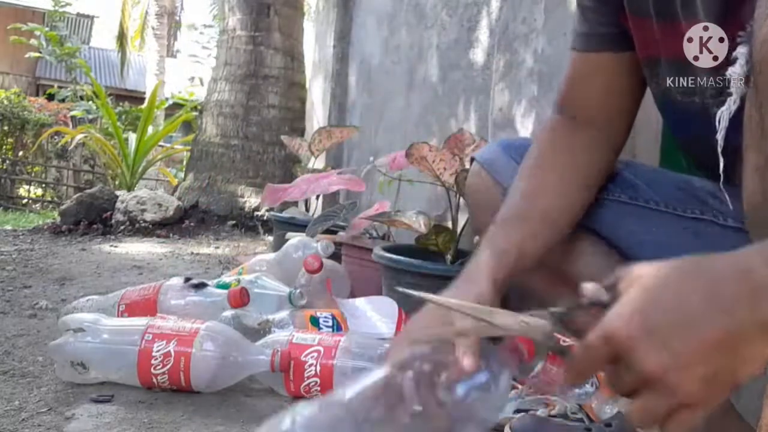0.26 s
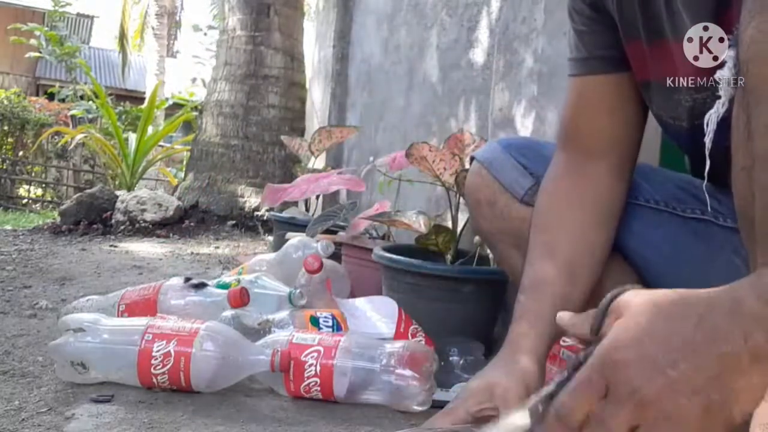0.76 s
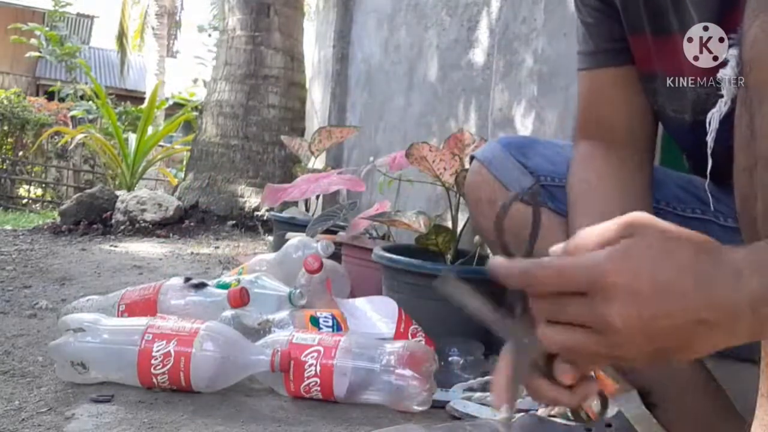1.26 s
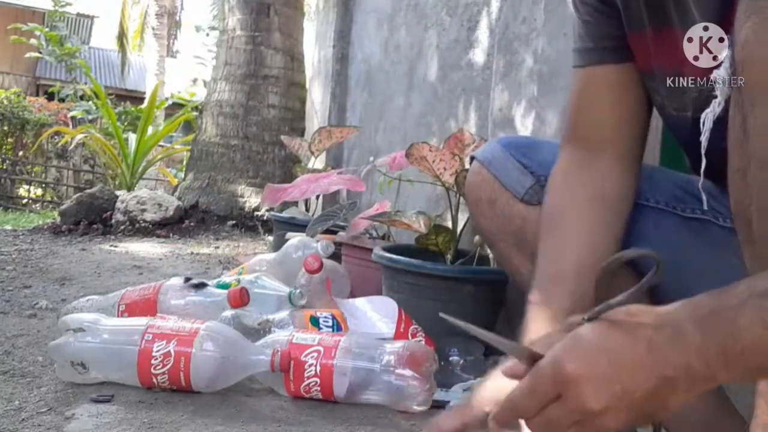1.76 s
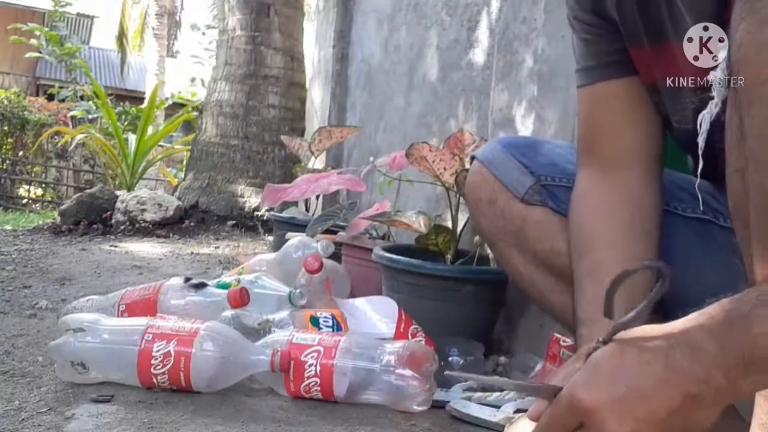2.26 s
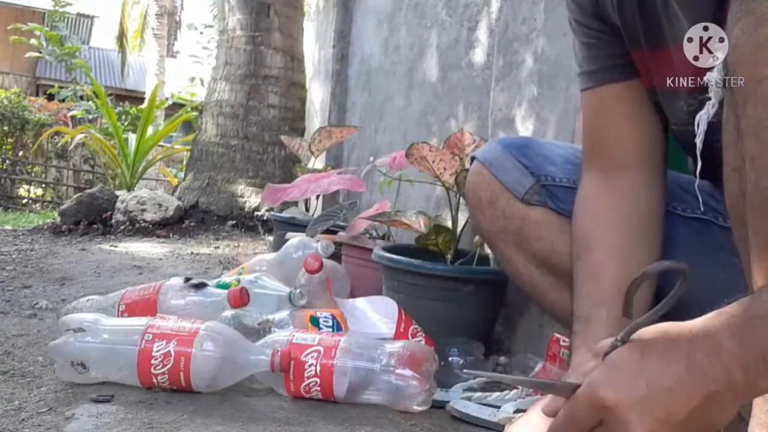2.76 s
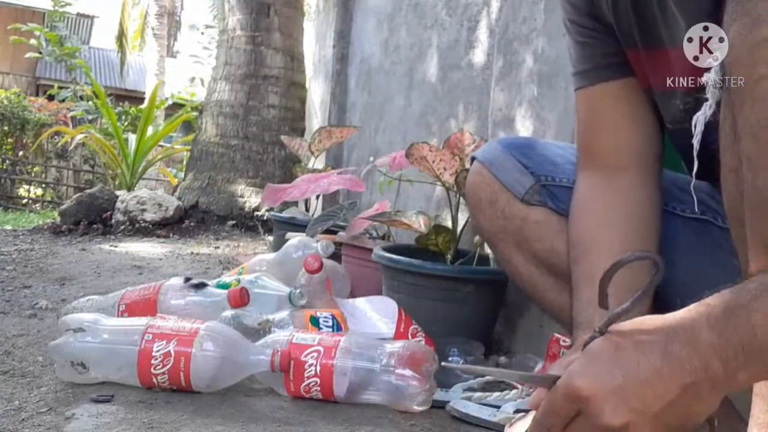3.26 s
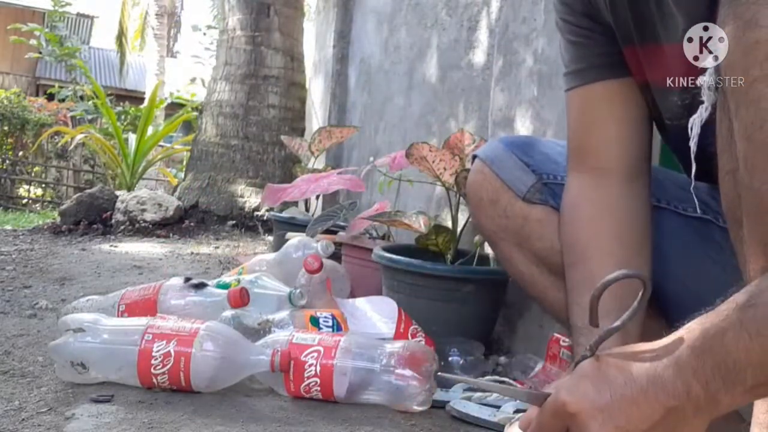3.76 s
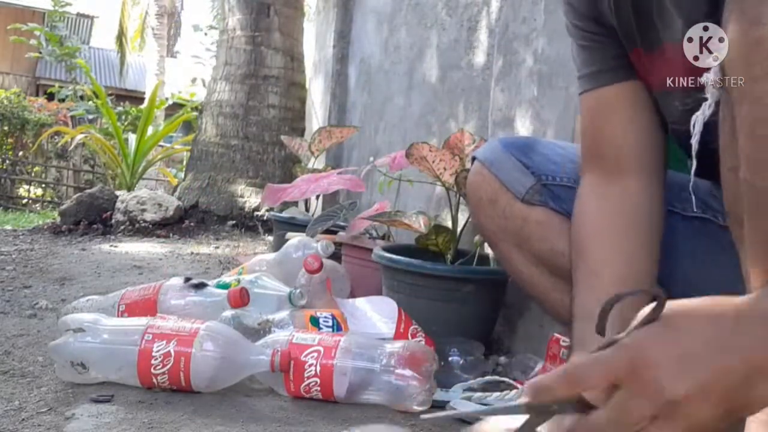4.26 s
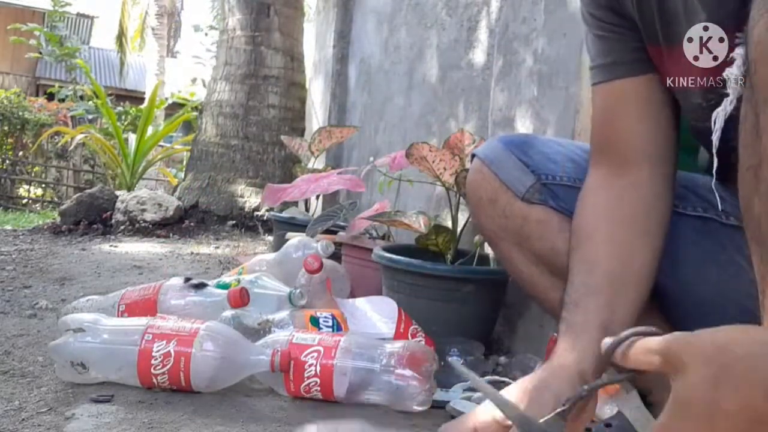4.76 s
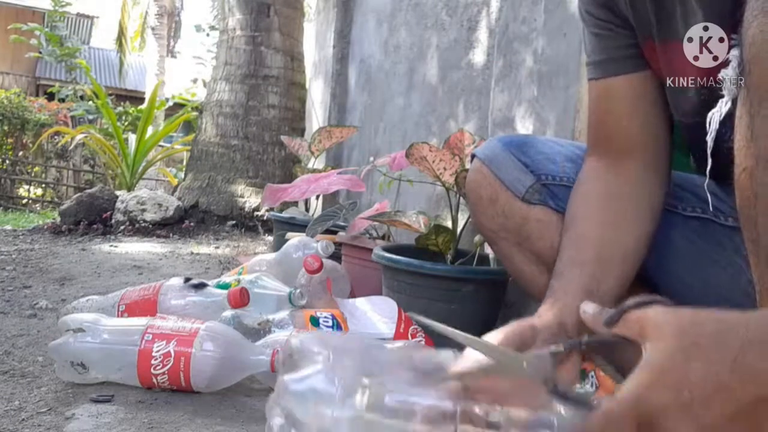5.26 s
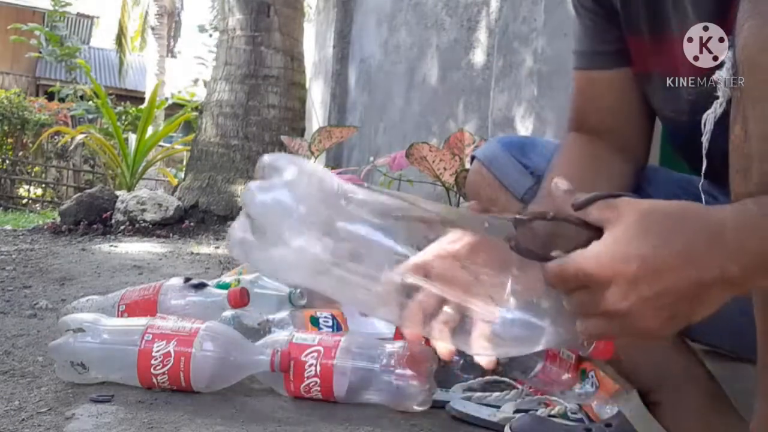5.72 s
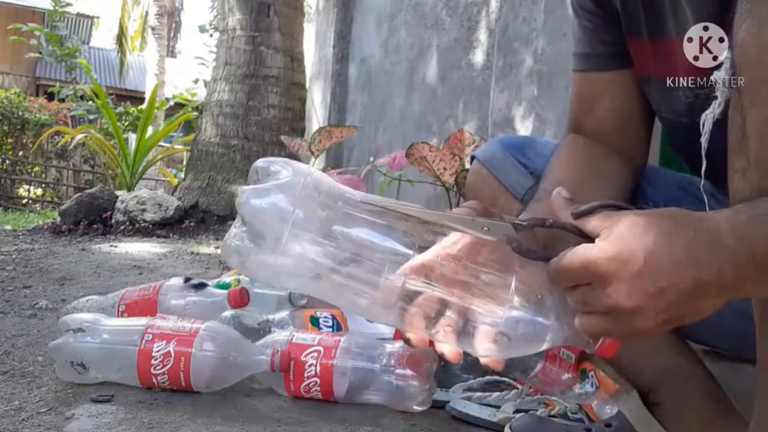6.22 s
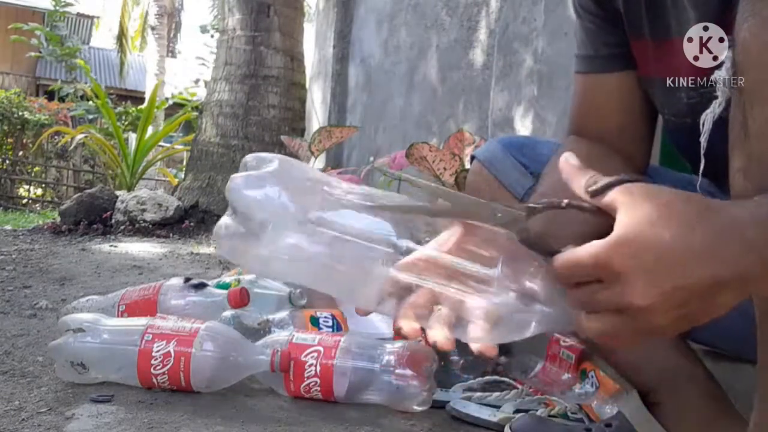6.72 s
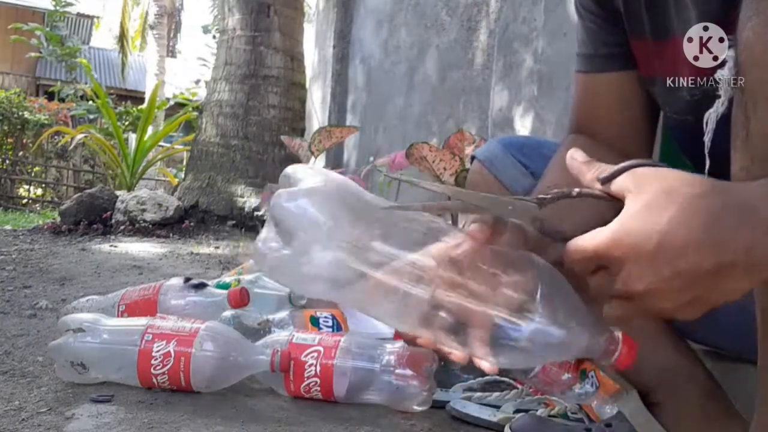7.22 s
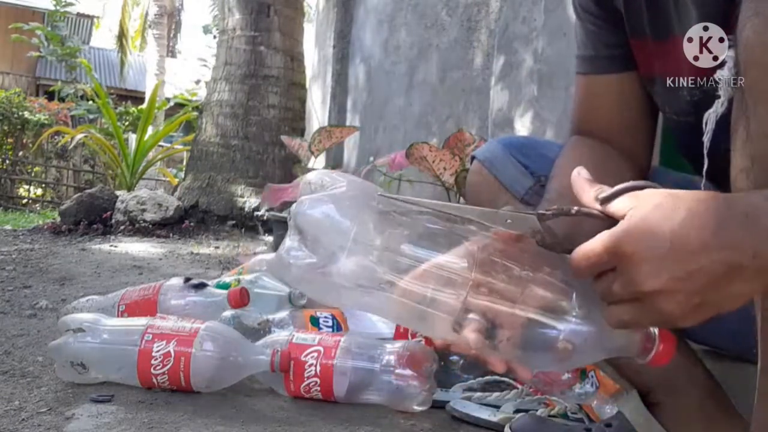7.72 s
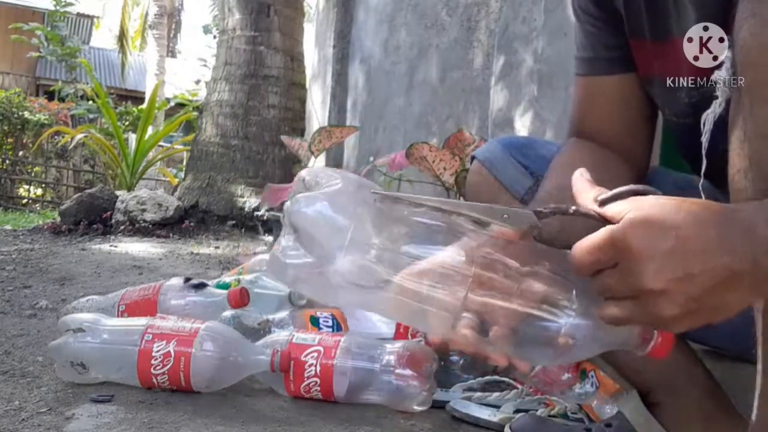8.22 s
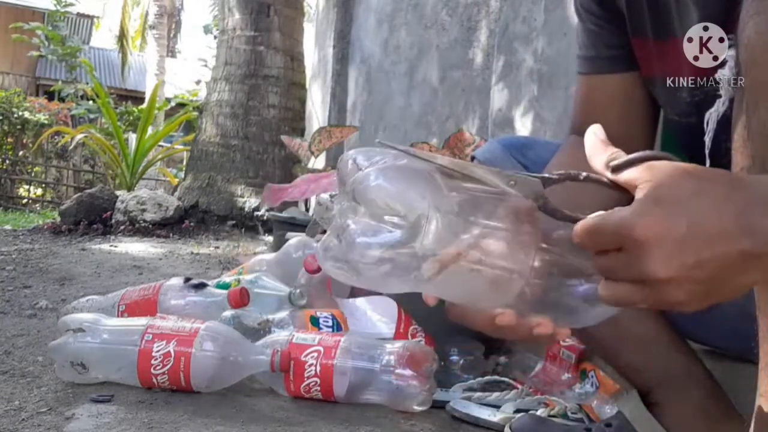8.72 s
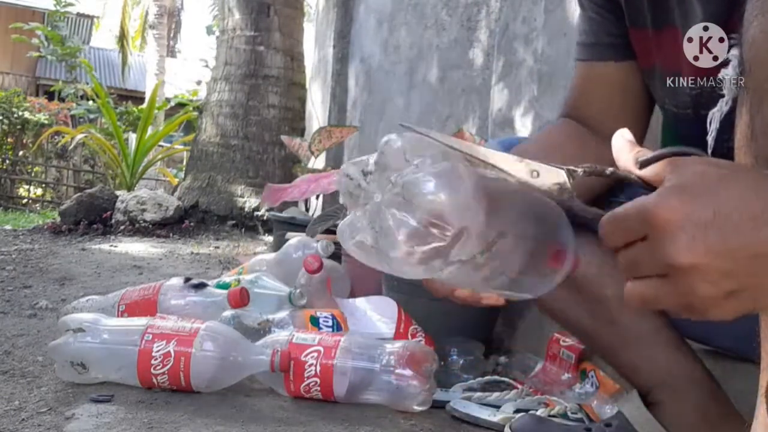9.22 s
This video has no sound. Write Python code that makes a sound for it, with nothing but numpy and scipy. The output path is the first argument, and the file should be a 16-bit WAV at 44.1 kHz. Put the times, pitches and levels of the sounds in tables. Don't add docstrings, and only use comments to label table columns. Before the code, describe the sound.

Hands and scissors work a thin plastic bottle in a yard: sharp hollow cracks, crinkling film, faint blade chatter, one hoarse cockerel crow midway.

```python
import sys
import numpy as np
from scipy import signal
from scipy.fft import rfft, irfft
from scipy.io import wavfile
from scipy.ndimage import uniform_filter1d

SR = 44100
rng = np.random.default_rng(int(sys.argv[2]) if len(sys.argv) > 2 else 0)


def makeup_ratio(level_db):
    decades = np.asarray(level_db, float) / 20
    return 10 ** decades


def pcm_store(signal):
    levels = np.round(np.clip(np.atleast_2d(signal), -1, 1) * 32767)
    wavfile.write(sys.argv[1], SR, levels.astype(np.int16).T)


N = 418068


def level(x, db):
    return x * makeup_ratio(db) / np.sqrt(np.mean(x ** 2))


def along(table, hz):
    table = np.array(table, float)
    return np.interp(np.log(np.maximum(hz, 1)), np.log(table[:, 0]), table[:, 1])


def curves(rows):
    s, *columns = np.transpose(rows)
    return [np.interp(np.arange(N) / SR, s, c) for c in columns]


def band(x, lo_hz, hi_hz):
    sos = signal.butter(2, [lo_hz, min(hi_hz, .45 * SR)], "band", fs=SR, output="sos")
    return signal.sosfilt(sos, x)


def walk(rate_hz):
    k = int(SR / rate_hz)
    steps = np.repeat(rng.standard_normal(N // k + 1), k)
    return 1.3 * uniform_filter1d(uniform_filter1d(steps, k), k)[:N]


# start_s, peak_db, panel_hz, edge_db (treble re peak)
TICKS = [(1.691, -30.5, 3120, 2.5), (1.712, -41, 1940, -2), (2.037, -47.5, 1880, 5), (2.2, -71, 2150, 7),
         (2.251, -57.5, 4730, 14), (2.317, -57.5, 2360, 6), (2.424, -39.5, 1690, -9), (2.547, -46, 2400, 0),
         (2.646, -52, 2440, 9), (2.875, -41.5, 4070, 2), (3.546, -47.5, 3190, 13.5),
         (3.929, -18.5, 1540, -4), (4.04, -4.5, 1170, -19), (4.095, -37.5, 1740, 2.5),
         (4.622, -16.5, 1320, -11), (6.48, -41, 900, -27), (7.67, -45, 1298, -25),
         (8.766, -30.5, 1240, -22), (8.864, -31, 1260, -15), (9.158, -25.5, 2240, -14.5),
         (9.176, -19.5, 1694, -15)]
# start_s, peak_db, panel_hz, edge_db
FOLDS = [(.321, -36.5, 1150, -6.5), (.478, -59, 910, 9), (.89, -54.5, 860, -11), (1.672, -32, 2300, -8.5),
         (1.764, -31, 3130, -10), (1.854, -31, 1810, -10.5), (3.361, -35.5, 2450, 1),
         (3.874, -31, 2330, -3.5), (3.947, -21, 1490, -15), (4.61, -21, 1670, -6), (5.467, -36, 1900, -9.5),
         (6.283, -42, 1710, -20.5), (6.447, -47, 890, -15), (6.503, -31.5, 1260, -17),
         (6.533, -18, 2280, -6), (7.843, -38, 2150, -5.5), (8.301, -30, 1060, -22),
         (8.442, -34.5, 1290, -5.5), (8.824, -29.5, 1420, -12), (8.974, -34.5, 1680, -15),
         (9.167, -34.5, 2360, -6), (9.426, -37, 1610, -14)]
# start_s, peak_db, panel_hz, edge_db
GRIP = [(.076, -54, 2640, 7), (.75, -43.5, 2430, -53), (1.426, -53, 2600, -1), (1.746, -35, 2870, -1),
        (1.785, -33.5, 2190, -7), (1.861, -34.5, 2260, 2.5), (2.004, -37, 2270, 3.5),
        (2.148, -47.5, 2820, 9.5), (2.228, -46.5, 720, -22), (2.399, -33.5, 1650, 4.5),
        (2.515, -27, 2380, -5), (2.588, -35.5, 1840, -4.5), (2.721, -50.5, 1330, 0.5),
        (2.892, -33, 2830, 7), (3.12, -35, 2220, 0), (3.727, -52, 1375, 1), (3.831, -55, 1382, 0)]
# start_s, peak_db, panel_hz, edge_db
PRESS = [(3.285, -14.5, 1510, -15.5), (3.302, -7, 1970, -10), (3.32, -10.5, 2920, -5.5),
         (3.47, -24, 960, -25.5), (3.478, -35, 1070, -31.5), (3.883, -25, 3305, 4),
         (3.935, -7, 1360, -10.5), (3.965, -7.5, 970, -24.5), (4.149, -16.5, 730, -31.5),
         (4.192, -5, 1341, -10.5), (4.218, -4, 2840, -15.5), (4.592, -30.5, 1560, -11),
         (4.737, -11, 2062, -2), (4.746, -11.5, 1622, -40), (4.852, -14, 2048, -17.5),
         (4.946, -20.5, 1830, -16.5), (4.993, -16, 1246, -26), (5.182, -25.5, 1720, -5),
         (5.248, -13.5, 1183, -34), (5.455, -41.5, 1880, -11), (5.488, -49.5, 1750, 4.5)]
# start_s, peak_db, panel_hz, edge_db
CUT = [(5.739, -54, 860, -31.5), (5.804, -50, 2260, -15), (5.782, -46, 2260, -25), (6.048, -44, 887, -10.5),
       (6.172, -54.5, 1286, 1.5), (6.315, -38, 803, -26), (6.373, -38.5, 1880, -19), (6.521, -8, 2630, -15),
       (6.75, -32.5, 2480, -6.5), (6.761, -35, 2320, -9), (6.923, -51.5, 2440, 2.5),
       (7.056, -41, 1920, -13), (7.169, -36, 1800, -6), (7.386, -22, 1907, -8), (7.479, -26.5, 2000, -21),
       (7.635, -33, 2240, -23), (7.76, -19, 2260, -25), (7.862, -18.5, 2480, -20.5),
       (7.87, -24.5, 2040, -2), (7.883, -23.5, 1790, -23), (7.964, -20, 2160, -40.5)]
# start_s, peak_db, panel_hz, edge_db
TURN = [(8.158, -35.5, 800, -20.5), (8.201, -19.5, 1450, -8.5), (8.216, -17.5, 1930, -17),
        (8.232, -20, 1910, -6), (8.257, -29, 2300, -6.5), (8.317, -9, 2530, -12.5), (8.323, -15.5, 2650, 0),
        (8.346, -3.5, 2180, -21.5), (8.735, -34.5, 2110, -4), (8.841, -25, 2300, -10),
        (8.903, -28, 1590, -26), (8.954, -47, 1870, -2), (9.038, -28.5, 1340, -24),
        (9.13, -18.5, 1850, -24), (9.327, -36.5, 1940, -34), (9.454, -23.5, 2620, -7.5)]
# table, crunch_db (re peak), thump_db (whole bottle)
KINDS = [(TICKS, -33.5, -0.37), (FOLDS, -2.5, 1.8), (GRIP, -21.5, -1.4), (PRESS, -23.5, -4.3),
         (CUT, -20, -5), (TURN, -22.5, 0.43)]


def cracks():
    out, t = np.zeros((2, N + 8192)), np.arange(4096) / SR
    events = [(*row, *db) for rows, *db in KINDS for row in rows]
    start_s, peak_db, panel_hz, edge_db, crunch_db, thump_db = np.transpose(events)
    count = len(start_s)
    noise = rng.standard_normal((count, 2, len(t)))
    grain = np.repeat(rng.exponential(size=(count, len(t) // 32)), 32, axis=1)

    second_slip = 0.13 * np.exp(-((t - .0025) / .0016) ** 2)
    slips = np.exp(-t / .0012) + second_slip * np.sqrt(grain)
    crunch_shape = np.exp(-t / 0.016) * np.clip(t / 0.0018, 0, 1)
    crunch = makeup_ratio(crunch_db + 6.5)[:, None] * crunch_shape * grain ** 0.78
    push = noise * (slips + crunch)[:, None]
    ringing = noise * (slips + .4 * crunch)[:, None]
    push[:, :, 3] += 1.2
    ringing[:, :, 3] += 1.2

    thump = makeup_ratio(thump_db)[:, None, None] * band(push, 135, 470)
    panel = body(push, ringing, panel_hz, ring_db=-6, scatter_db=5.5) + thump
    edge = band(push, 3600, 11300)

    def unit(x):
        return x / np.abs(x[:, :1]).max(axis=2, keepdims=True)

    snap = unit(panel) + makeup_ratio(edge_db + 4.5)[:, None, None] * unit(edge)
    snap = snap * makeup_ratio(peak_db - 4.0)[:, None, None]
    side = 0.4 * band(snap[:, 1], 1300, 21000)
    for i, mid, apart in zip((start_s * SR).astype(int) - 6, snap[:, 0], side):
        out[0, i:i + len(t)] += mid + apart
        out[1, i + 2:i + 2 + len(t)] += mid - apart
    return out[:, :N]


# centre_hz, width_hz, level_db
BOTTLE = [(140, 58, -9.5), (310, 160, 0.5), (720, 220, -1.5), (946, 420, -2.5), (1314, 400, -7),
          (2025, 350, -12), (3540, 510, -12.5)]


def body(push, ringing, panel_hz, ring_db, scatter_db):
    out = np.array([band(p, hz / 2.04, hz * 2.076) + makeup_ratio(ring_db) * band(r, hz / 1.12, hz * 1.079)
                    for p, r, hz in zip(push, ringing, panel_hz)])
    scatter = rng.standard_normal((len(BOTTLE), len(push)))
    for (hz, width_hz, db), chance in zip(BOTTLE, scatter):
        near_db = db + 6.5 - 14.55 * abs(np.log2(hz / panel_hz)) + scatter_db * chance
        gain = makeup_ratio(near_db) * np.sqrt(panel_hz / width_hz)
        out = out + gain[:, None, None] * band(ringing, hz - width_hz / 2, hz + width_hz / 2)
    return out


# start_s, end_s, body_db, treble_db
RUSTLE = [(8.553, 8.613, -73.5, -87), (0.837, 0.988, -73.5, -77), (1.665, 1.797, -68, -74),
          (1.826, 1.856, -70, -61.5), (1.931, 2.032, -75, -67.5), (2.095, 2.267, -90, -82),
          (2.394, 2.401, -53.5, -67), (2.488, 2.626, -62.5, -63.5), (2.499, 2.512, -54.5, -58),
          (7.158, 7.18, -66, -64.5), (6.87, 6.92, -79.5, -82), (4.733, 4.76, -42, -50),
          (2.815, 2.867, -74, -78), (3.889, 3.986, -49.5, -45), (4.133, 4.213, -50, -54),
          (4.195, 4.214, -45, -44), (5.418, 5.469, -57, -80), (5.731, 5.825, -71.5, -100),
          (6.277, 6.38, -60.5, -97), (6.44, 6.518, -75.5, -73.5), (7.245, 7.296, -80.5, -73),
          (7.462, 7.554, -53.5, -56), (7.814, 7.88, -75.5, -67.5), (8.139, 8.2, -67, -77.5),
          (8.298, 8.363, -36.5, -50), (6.64, 6.676, -90, -72.5), (8.757, 8.87, -63, -78),
          (8.947, 9.001, -71, -63.5), (9.118, 9.168, -53.5, -63), (9.269, 9.353, -66.5, -64.5),
          (9.42, 9.49, -57, -64)]


def rustle():
    out, t = 0, np.arange(N // 32 + 1) * 32 / SR
    for part, rate_hz in (("body", 210), ("treble", 550)):
        effort = 0
        for start_s, end_s, body_db, treble_db in RUSTLE:
            rise = np.clip((t - start_s) / 0.0054, 0, 1)
            fall = np.exp(-np.maximum(t - end_s, 0) / 0.02)
            effort = effort + makeup_ratio(body_db if part == "body" else treble_db) * rise * fall

        sizes = makeup_ratio(np.minimum(4.0 * rng.exponential(size=N), 11))
        clicks = (rng.random(N) < rate_hz / SR) * sizes
        smear = signal.lfilter([1], [1, -np.exp(-1 / (0.0017 * SR))], clicks ** 2) ** .5
        push = rng.standard_normal((2, N)) * (smear + 0.25)
        if part == "body":
            pair = np.broadcast_to(push, (2, 2, 2, N))
            panels = body(*pair, np.array([950, 2300]), ring_db=2, scatter_db=7)
            mid, side = band(panels.sum(0), 260, 3300)
        else:
            mid, side = band(push, 3600, 12000)
        side = 0.6 * band(side, 1500, 16000)
        stereo = level(np.array([mid + side, mid - side]), 1.2)
        out = out + stereo * np.repeat(effort, 32)[:N] * makeup_ratio(2.0 * walk(30))
    return out


# start_s, peak_db
CHATTER = [(0.705, -49.5), (0.74, -43.5), (0.795, -56), (0.891, -52.5), (0.974, -45.5), (1.066, -59.5),
           (1.118, -50.5), (1.225, -64), (1.292, -62.5), (1.468, -50.5)]
# pitch_hz, level_db, t60_s
BLADES = [(7470, -11, 0.03), (10700, -34, 0.039), (11370, 11, 0.046), (12430, 27, 0.018),
          (13500, -11, 0.023), (14500, -4, 0.037)]


def scissors():
    out, t = np.zeros((2, N)), np.arange(4096) / SR
    for start_s, peak_db in CHATTER:
        touch = rng.standard_normal((2, len(t))) * np.minimum(t / 0.0016, 1) * np.exp(-t / 0.013)
        ring = 0
        for hz, db, t60_s in BLADES:
            db_chance, hz_chance = rng.standard_normal(2)
            tone = np.sin(2 * np.pi * hz * (1 + 0.0011 * hz_chance) * t)
            ring = ring + makeup_ratio(db + 2.1 * db_chance) * tone * np.exp(-np.log(1000) * t / t60_s)
        rung = signal.fftconvolve(touch, ring[None], axes=1)[:, :len(t)]
        sound = level(rung, -9) + level(band(touch, 7000, 14500), 0)
        i = int(start_s * SR)
        out[:, i:i + len(t)] += makeup_ratio(peak_db + 5.5) * sound / np.abs(sound).max()
    return out


# start_s, peak_db, centre_hz
PRICKS = [(0.0314, -54, 10500), (0.2932, -59, 10000), (0.3885, -57, 11900), (0.5975, -58, 9360),
          (0.6374, -57, 9530), (0.6794, -58, 9550), (0.8545, -53, 11900), (1.335, -47.5, 8000),
          (1.6444, -66, 4500), (1.7754, -37, 11600), (1.8744, -43, 4790), (1.9314, -58, 8230),
          (1.94, -45, 10500), (2.0946, -64, 11500), (2.1064, -61, 4940), (2.1201, -54, 10500),
          (2.1654, -44, 10400), (2.1784, -50, 8980), (2.2164, -47, 9050), (2.2796, -49, 10200),
          (2.3038, -40.5, 11600), (3.41, -43, 12000), (4.195, -14.5, 4440), (5.1141, -49, 4754),
          (8.1269, -64, 8560), (8.1798, -44, 10200), (8.3126, -24, 5400), (8.4226, -39, 4660),
          (2.4728, -49, 10500), (2.4947, -34.5, 4570), (2.605, -43, 10700), (2.616, -41, 9930),
                (2.7691, -65, 9810), (2.7886, -61, 9580), (2.8374, -49.5, 10800), (2.9124, -44, 11200),
                (2.9432, -55, 7440), (2.9567, -51, 11200), (6.6518, -48.5, 10300), (6.7281, -38.5, 10400),
                (6.8867, -63, 7870), (7.2504, -58, 9860), (7.2629, -57, 5280),
          (2.1475, -31, 10200), (2.5466, -34, 11900), (2.5875, -37, 11700), (2.8744, -25, 11000),
         (3.2854, -15, 4510), (4.7396, -18, 5320), (8.8139, -47, 11000), (9.1124, -41, 5070)]
# start_s, peak_db,
# centre_hz
TAPS = [(0.335, -47, 751), (0.539, -61.5, 770), (0.971, -54.5, 899), (3.684, -64, 840), (4.601, -25, 1197),
        (5.826, -54, 2236), (5.946, -59.5, 773), (6.362, -38, 1828), (8.327, -15.5, 2050),
        (8.365, -26, 1380),
        (2.228, -49, 912), (5.805, -54, 1370), (6.295, -46, 824), (7.38, -29, 1150), (7.539, -39, 845),
             (7.889, -39, 1140), (8.295, -16, 713), (8.561, -59, 1470), (8.589, -64, 1470),
             (8.641, -64, 1070), (8.805, -37, 2060)]


def ticks_and_taps():
    out, t = np.zeros((2, N)), np.arange(1024) / SR
    bright, dull = PRICKS, TAPS
    for rows, decay_s, spread in ((bright, .0012, 1.7), (dull, .003, 1.35)):
        for start_s, peak_db, hz in rows:
            burst = rng.standard_normal((2, len(t))) * np.exp(-t / decay_s)
            mid, side = band(burst, hz / spread, hz * spread)
            side = side * min(hz / 5000, .6)
            stereo = np.array([mid + side, mid - side])
            i = int(start_s * SR)
            out[:, i:i + len(t)] += stereo * makeup_ratio(peak_db + 0.1) / np.abs(mid).max()
    return out


# start_s, end_s, pitch_hz, level_db
CREAKS = [(1.75, 1.85, 2100, -67), (1.75, 1.796, 1230, -64), (1.945, 2.045, 1310, -63.5),
          (4.151, 4.174, 1004, -37), (4.166, 4.193, 2420, -40.5), (4.264, 4.31, 2370, -57.5),
          (5.764, 5.785, 2290, -52), (5.798, 5.845, 2240, -69), (5.74, 5.77, 747, -66.5),
          (2.65, 2.687, 1390, -70), (2.719, 2.757, 1400, -68), (2.96, 3.007, 3900, -75),
          (3.231, 3.268, 3780, -74.5), (5.48, 5.57, 2270, -72), (8.56, 8.605, 1600, -68)]


def creaks():
    out, t = np.zeros((2, N)), np.arange(int(.2 * SR)) / SR
    for start_s, end_s, hz, db in CREAKS:
        slips = rng.standard_normal((2, len(t))) * np.repeat(rng.exponential(size=len(t) // 60), 60)
        fade = np.clip(t / .004, 0, 1) * np.exp(-np.maximum(t - end_s + start_s, 0) / 0.0065)
        mid, side = level(band(slips, hz / 1.085, hz * 1.085), db) * fade
        i = int(start_s * SR)
        out[:, i:i + len(t)] += [mid + .4 * side, mid - 0.44 * side]
    return out


# time_s, pitch_hz
CROW_PITCH = [(4.338, 1160), (4.38, 1300), (4.41, 1324), (4.45, 1257), (4.472, 1232), (4.478, 1088),
              (4.51, 1238), (4.7, 1244), (4.86, 1227)]
# time_s, pitch_hz
NOTE_PITCH = [(4.9, 1194), (5.15, 1178), (5.281, 1162), (5.37, 1139), (5.408, 1122), (5.42, 1083),
              (5.46, 1053)]
# time_s, effort_db, first_db (first partial re second, high with the beak nearly shut)
CROW_EFFORT = [(4.348, -53, 11), (4.38, -38.5, -9), (4.44, -41.5, -3.5), (4.475, -51, 1), (4.51, -44, -1),
               (4.88, -46.5, -4.5), (4.9, -47.5, -19.5), (5.17, -42, -8.5), (5.43, -45.5, -8)]
# multiple, level_db
CROW_UPPER = [(1, 0), (2, 0), (3, -13), (4, -17), (5, -23), (6, -35), (7, -41), (8, -35), (9, -25),
              (10, -28), (11, -24), (12, -25), (13, -40)]
# multiple, level_db (re second partial)
HALF_LINES = [(.84, -13), (1.5, -18), (2.45, -12.5), (3.75, -20)]


def cockerel():
    start_s, hoarse_from_s, hoarse_until_s, break_s = 4.34, 4.5, 4.89, 5.415
    attack_s, release_s = 0.0058, 0.018
    (hz,), (second_db, shut_db) = curves(CROW_PITCH + NOTE_PITCH), curves(CROW_EFFORT)
    first_db = second_db + shut_db
    t = np.arange(N) / SR
    hoarse = np.clip((hoarse_until_s - t) / 0.022, .05, 1) * np.clip((t - hoarse_from_s) / 0.067, .8, 1)
    hoarse = hoarse + np.clip((t - break_s) / 0.016, 0, 1)
    jitter = .021 * hoarse * walk(900) + .008 * hoarse * walk(60)
    phase = 2 * np.pi * np.cumsum(hz * (1 + jitter)) / SR
    flutter_db = .7 * walk(25) + hoarse * (4 * walk(200) + 2.2 * walk(70))

    upper_db = dict(CROW_UPPER)
    out = 0
    for k in upper_db:
        db = first_db if k == 1 else second_db + upper_db[k] - upper_db[2]
        shake_db = flutter_db
        if k > 2:
            hoarse_db = 4 * (k == 4) - 3 * (k > 6)
            shake_db = shake_db + 5 * walk(18) - 5.5 + hoarse * hoarse_db
            shake_db = shake_db - 20 * (t > break_s) * (4 < k < 8)
        lag = np.array([[0], [1.173 * min(k, 2) + rng.standard_normal() * (k > 2)]])
        partial = np.sin(k * phase + lag) * (k * hz < .36 * SR)
        out = out + np.sqrt(2) * makeup_ratio(db + 6.0) * makeup_ratio(shake_db) * partial

    for k, db in HALF_LINES:
        on = np.clip((t - hoarse_from_s) / 0.073, 0, 1) * np.clip((hoarse_until_s - t) / 0.013, 0, 1)
        out = out + makeup_ratio(second_db + db + 2.5 + 4.0 * walk(60)) * on * np.sin(k * phase)

    air = rng.standard_normal((2, N))
    rasp = level(band(air, 900, 3400), -12) * np.clip((t - hoarse_from_s) / .08, .4, 1)
    for lo_hz, hi_hz, db in ((4500, 5500, -16), (5600, 10000, -27), (10500, 15000, -19)):
        rasp = rasp + level(band(air, lo_hz, hi_hz), db)
    rasp = rasp * (1 + np.cos(phase)) * (hoarse + .1) * makeup_ratio(second_db)
    end_s = CROW_EFFORT[-1][0]
    gate = np.clip((t - start_s) / attack_s, 0, 1) * np.clip(1 - (t - end_s) / release_s, 0, 1) ** 2
    return (out + rasp) * gate * makeup_ratio([[-.8], [.8]])


def walls(x, t60_s, top_hz, gap_s, alike):
    t = np.arange(SR // 2) / SR
    decay = np.exp(-np.log(1000) * t / t60_s) * np.clip(t / gap_s, 0, 1)
    mid, side = rng.standard_normal((2, len(t))) * decay
    side = side - alike * band(side, 30, 1000)
    tails = band(np.array([mid + side, mid - side]), 55, top_hz)
    return signal.fftconvolve(x, tails / np.sqrt(np.sum(tails ** 2) / 2), axes=1)[:, :N]


# middle_s, half_length_s, level_db
LEAVES = [(.15, 0.22, -82), (0.666, .05, -74), (1.2, 0.36, -81.5), (2.2, .15, -79), (3.17, 0.075, -78),
          (3.8, 0.092, -80), (5.52, .04, -83), (5.901, .04, -78), (6.22, .04, -86.5), (6.655, 0.033, -71.5),
          (7.12, .06, -77), (7.74, .04, -77.5), (8.601, 0.081, -80), (9.302, .1, -78)]


def leaves():
    t = np.arange(N // 64 + 1) * 64 / SR
    hiss = level(band(rng.standard_normal((2, N)), 7500, 10300), 0)
    breeze = sum(makeup_ratio(db) * np.exp(-((t - middle_s) / half_s) ** 2) for middle_s, half_s, db in LEAVES)
    return hiss * np.repeat(breeze, 64)[:N] * makeup_ratio(1.9 * walk(25))


# freq_hz, density_db (per Hz)
YARD = [(15, -55), (25, -28), (108, -5), (175, 2.5), (249, -4), (373, -7.5), (840, -32.5), (1260, -27.5),
        (4870, -35.5), (9000, -38), (16000, -40)]
# freq_hz, left_right_correlation
YARD_LIKENESS = [(40, 0.53), (90, 0.96), (300, .92), (700, 0.8), (1500, 0.088), (15000, .02)]
# start_s, end_s, pitch_hz, level_db
FAR_NOTES = [(0.384, 1.54, 463, -74.5), (5.702, 6.362, 187.5, -72.5), (6.746, 7.142, 371, -75)]


def yard():
    out, swell, t = 0, walk(0.72), np.arange(N) / SR
    for hz in 35 * 2 ** np.arange(0, 9, .5):
        mid, side = band(rng.standard_normal((2, N)), hz / 1.19, hz * 1.107)
        alike = np.clip(along(YARD_LIKENESS, hz), 0, 1)
        pair = np.sqrt(1 + alike) * mid + np.sqrt(1 - alike) * side * np.array([[1], [-1]])
        out = out + makeup_ratio(along(YARD, hz) + 1.2 * swell + 2.2 * walk(6)) * pair
    out = level(out, -65.5)
    for start_s, end_s, hz, db in FAR_NOTES:
        fade = np.clip((t - start_s) / 0.055, 0, 1) * np.clip((end_s - t) / 0.041, 0, 1)
        gain = np.sqrt(2) * makeup_ratio(db + 3.0 * walk(12)) * fade
        out = out + gain * np.sin(2 * np.pi * np.cumsum(hz * (1 + .004 * walk(5))) / SR)
    return out


def scene():
    bottle, bird = cracks() + rustle() + scissors(), cockerel()
    near = makeup_ratio(-19.5) * walls(bottle.mean(0)[None], t60_s=0.17, top_hz=8800, gap_s=0.018, alike=0.5)
    far = makeup_ratio(-14) * walls(bird[:1], t60_s=0.3, top_hz=3200, gap_s=0.026, alike=0.56)
    hold = .25 * SR
    loudness = signal.lfilter([1 / hold], [1, -np.exp(-1 / hold)], bottle[0] ** 2)
    duck = (1 + loudness / makeup_ratio(-105)) ** -.12
    small = ticks_and_taps() + creaks() + leaves()
    return bottle + near + bird + far + duck * yard() + small


def top_cut(x):
    return signal.sosfilt(signal.butter(12, 16640, fs=SR, output="sos"), x)


# freq_hz, left_minus_right_db
PORTS = [(60, .4), (1000, .6), (3500, 1.5), (6000, 6), (9000, 14), (13000, 8), (16000, 8)]


def record(dry):
    hz = np.fft.rfftfreq(N, 1 / SR)
    ratio = makeup_ratio(along(PORTS, hz))
    ends = makeup_ratio(-np.clip(hz - 15300, 0, 3000) * .02) * np.clip(hz / 70, 0, 1) ** 2.2
    balance = np.array([2 * ratio / (1 + ratio), 2 / (1 + ratio)])
    ports = irfft(rfft(dry) * ends * balance, N)
    return top_cut(ports)


dry = scene()
out = record(dry)
pcm_store(out)
```